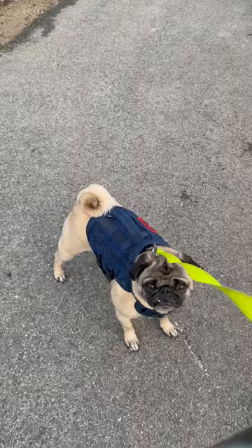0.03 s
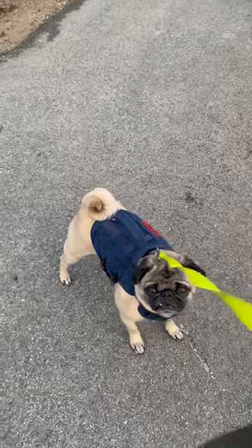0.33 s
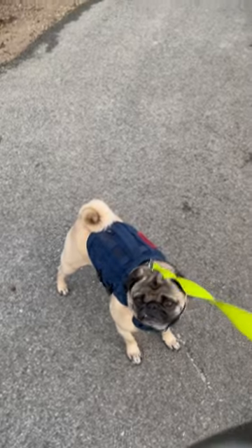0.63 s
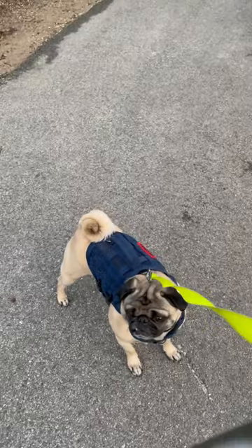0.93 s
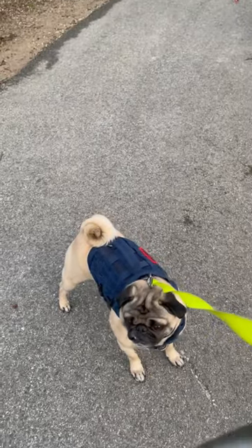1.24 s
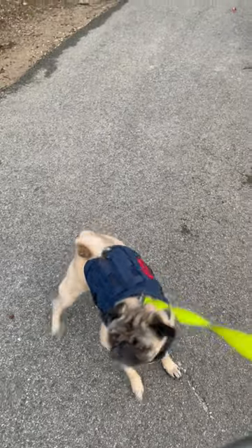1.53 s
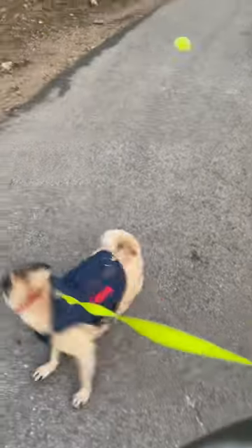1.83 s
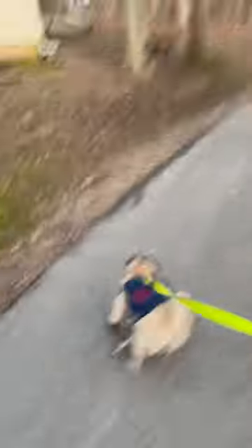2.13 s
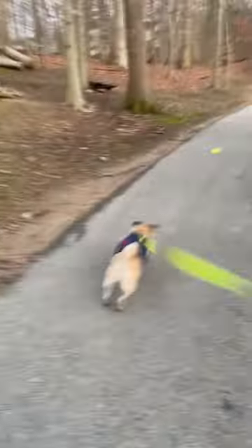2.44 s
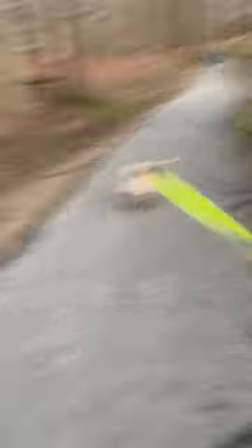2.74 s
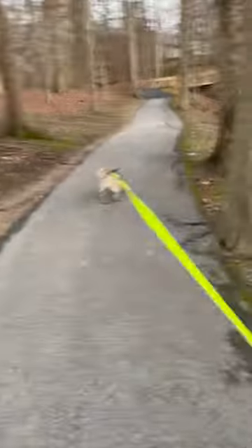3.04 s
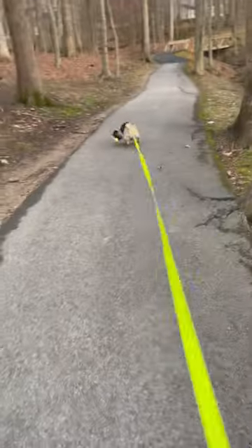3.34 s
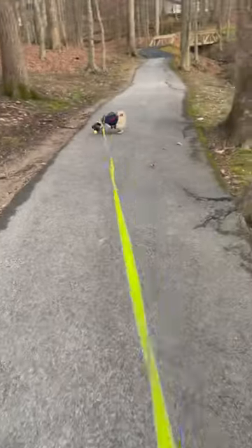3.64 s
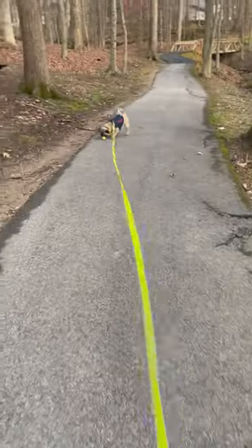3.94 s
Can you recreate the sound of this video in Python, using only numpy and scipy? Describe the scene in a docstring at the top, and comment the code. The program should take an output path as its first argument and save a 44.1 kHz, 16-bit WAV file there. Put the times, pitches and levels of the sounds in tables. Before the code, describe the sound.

A leash strap unreels close by, whirring, rattling and ticking over faint outdoor noise.

```python
"""A steady distant roar, a faint bird and low buffeting on the microphone come first. Then a small dog bolts
after a ball on a paved woodland path, and its webbing leash runs out through the hand, close by. The weave
sings at a pitch that follows each bound, over a rush of friction and the reel's rattle. The dog's claws tick
and scratch; the strap snaps, flaps and scrapes as it uncoils; the hand rustles and thumps on the phone."""
import sys
import numpy as np
from scipy import signal
from scipy.fft import rfft, irfft
from scipy.io import wavfile
from scipy.ndimage import uniform_filter1d

SR = 44100
rng = np.random.default_rng(int(sys.argv[2]) if len(sys.argv) > 2 else 0)


def master_out(mix):
    """Clip the mix to full scale and print it as 16-bit PCM to the path in sys.argv[1]."""
    frames = np.transpose(np.atleast_2d(mix))
    ceiling = np.clip(frames, -1, 1)
    pcm = np.round(ceiling * 32767).astype(np.int16)
    wavfile.write(sys.argv[1], SR, pcm)


N = 176400
T = np.arange(N) / SR


# The strap's speed, surging with each bound. Each row: time in seconds, ribs passing per second.
RIBS_PER_S = [(1.8, 830), (1.905, 1110), (1.965, 890), (2.03, 1070), (2.12, 820), (2.18, 940), (2.23, 830),
              (2.32, 830), (2.385, 660), (2.45, 890), (2.5, 1020), (2.55, 940), (2.6, 790), (2.64, 880),
              (2.68, 1060), (2.72, 1260), (2.79, 1010), (2.85, 975), (2.88, 1220), (2.912, 1385),
              (2.975, 1220), (3.03, 870), (3.065, 980), (3.115, 1350), (3.195, 880), (3.23, 775),
              (3.278, 970), (3.35, 740)]
# How hard the weave sings. Each row: time in seconds, drive of the fundamental and of the overtones in dB.
WEAVE_DRIVE = [(1.78, -75, -70), (1.85, -53, -54), (1.94, -44.5, -52), (1.99, -60, -57), (2.04, -57, -49),
               (2.1, -62, -63), (2.18, -51, -60), (2.28, -59, -50), (2.36, -58, -45), (2.42, -57, -60),
               (2.5, -45, -43), (2.62, -55, -53), (2.67, -42.5, -48), (2.73, -49, -44), (2.84, -41.5, -44),
               (2.91, -44, -40.5), (2.97, -48, -43), (3.0, -41.5, -54), (3.055, -46, -41.5),
               (3.1, -49, -48), (3.24, -55, -52), (3.29, -44, -51), (3.36, -75, -75)]
# Balance of the harmonics: one trim in dB for each, from the fundamental up.
HARMONIC_TRIMS = [0, 0, -8, -2, -12]
def singing_weave():
    """Passing ribs make a tone that rises with the strap's speed and sounds through the housing."""
    jitter, patchy_db = .0115, 3
    rib_hz = uniform_filter1d(curve(RIBS_PER_S), size=800) * (1 + jitter * wander(500))
    phase = 2 * np.pi * np.cumsum(rib_hz) / SR
    times, fundamental_db, overtone_db = np.array(WEAVE_DRIVE).T
    tone = np.zeros(N)
    for harmonic, trim_db in enumerate(HARMONIC_TRIMS, start=1):
        drive_db = np.interp(T, times, fundamental_db if harmonic == 1 else overtone_db)
        tone += amp(drive_db + trim_db + patchy_db * wander(60)) * unit(np.sin(harmonic * phase))
    return irfft(rfft(tone) * ringing(HOUSING_RESONANCES))


# The swell of the friction. Each row: time in seconds, level in dB.
FRICTION_LEVEL = [(1.42, -71), (1.5, -58), (1.75, -54.5), (1.81, -44), (1.9, -43), (1.95, -49.5),
                  (2.04, -41.5), (2.17, -49), (2.25, -39), (2.32, -44), (2.5, -42.5), (2.6, -41.5),
                  (2.9, -40), (3.0, -45), (3.14, -34.5), (3.22, -42.5), (3.3, -41), (3.37, -48),
                  (3.47, -53), (3.62, -62.5), (4.0, -62.5)]
# The mid-heavy colour of strap and hand. Each row: frequency in Hz, relative level in dB.
FRICTION_EQ = [(150, -26), (400, -16.5), (700, -9.5), (1020, 0.5), (1250, -7.5), (1700, -0.5), (2500, -2.5),
               (3050, -7), (4300, -7.5), (4900, -6), (6600, -12), (8500, -19), (10200, -17.5), (14000, -34),
               (16500, -44)]
def rubbing():
    """The strap's fibres drag through the hand in a gritty rush."""
    return colour(grit(spread_db=0.5), response(FRICTION_EQ)) * amp(curve(FRICTION_LEVEL))


# The ring of the reel's housing. Each row: frequency in Hz, width in Hz, relative level in dB.
HOUSING_RESONANCES = [(1010, 210, 1), (1340, 120, -6), (1670, 90, -3), (1960, 200, 1), (2440, 140, 1.5),
                      (2740, 130, -1), (3080, 230, -3), (3940, 170, -2), (4760, 200, -1), (5370, 400, 0)]
def reel_rattle():
    """Tiny random knocks ring the housing, riding just under the friction."""
    knocks_per_s, trim_db = 650, -5
    knocks = unit(rng.standard_normal(N) * (rng.random(N) < knocks_per_s / SR))
    return colour(knocks, ringing(HOUSING_RESONANCES)) * amp(curve(FRICTION_LEVEL) + trim_db)


def running_strap():
    """Weave, reel and friction flutter in level together."""
    flutter_db = 1.5
    return (singing_weave() + reel_rattle() + rubbing()) * amp(flutter_db * wander(110))


# Sharp ticks of the dog's claws, most as it starts off. Each row: start in seconds, strength in dB, decay in
# ms.
TICK_HITS = [(1.5225, -32, 2.4), (1.5262, -29.5, 3.2), (1.5768, -22, 0.39), (1.5795, -38, 1.5),
             (1.6365, -21.5, 0.3), (1.659, -27, 1), (1.7555, -20.5, 1.2), (1.7665, -22.5, 1.5),
             (1.8495, -33, 0.79), (1.987, -24.5, 1.1), (2.2115, -29, 5), (3.789, -44, 2.6)]
# Their bright edge. Each row: frequency in Hz, relative level in dB.
TICK_EQ = [(500, -22), (2000, -5), (3500, -3), (4700, 3), (5900, 4.5), (7200, 12.5), (10000, 0.5),
           (13000, -6.5), (16000, 8.5)]
def ticks():
    """The dog's claws scratch in small, sharp ticks."""
    return colour(bursts(TICK_HITS), response(TICK_EQ))


# Hard snaps. Each row: start in seconds, strength in dB, decay in ms.
SNAP_HITS = [(1.8915, -18.5, 1.2), (2.2355, -21.5, 1.1), (2.2805, -29, 3.2), (2.4945, -26, 2.8)]
# Their high ring. Each row: frequency in Hz, width in Hz, relative level in dB.
SNAP_RESONANCES = [(1700, 1000, -9), (2640, 120, -0.5), (4090, 77, -1), (4940, 250, -4.5), (5840, 650, -6),
                   (10200, 380, -15)]
def snaps():
    """The strap snaps taut and rings briefly."""
    return colour(bursts(SNAP_HITS), ringing(SNAP_RESONANCES))


# Duller slaps. Each row: start in seconds, strength in dB, decay in ms.
FLAP_HITS = [(2.7795, -27.5, 5), (2.8978, -27.5, 3), (2.9078, -26, 3.5), (2.9268, -28.5, 2),
             (2.957, -33, 1.5), (3.0305, -29.5, 4), (3.129, -30, 4), (3.146, -29.5, 4), (3.174, -29.5, 3),
             (3.2985, -30, 2)]
# Their midrange body. Each row: frequency in Hz, width in Hz, relative level in dB.
FLAP_RESONANCES = [(1050, 230, -16), (1750, 105, 6), (2270, 290, -6.5), (3740, 990, -12.5)]
def flaps():
    """Loops of strap flap against the hand."""
    return colour(bursts(FLAP_HITS), ringing(FLAP_RESONANCES))


# Short dry scrapes. Each row: middle in seconds, level in dB, length in seconds.
SCRAPE_SWELLS = [(.17, -70.5, 0.1), (1.502, -47.5, 0.025), (1.6, -48, 0.022), (1.68, -50, 0.028),
                 (2.03, -49, 0.014), (2.228, -37, 0.013), (2.46, -42, 0.016), (3.485, -39.5, 0.021),
                 (3.52, -47, 0.014), (3.565, -45, 0.026), (3.675, -50.5, 0.072), (3.712, -41.5, 0.022)]
# Their hissy colour. Each row: frequency in Hz, relative level in dB.
SCRAPE_EQ = [(500, -6), (2000, -9.5), (5200, 1.5), (10500, 0), (13000, -4.5), (16000, 1.5)]
def scrapes():
    """Brief gritty slides as the strap shifts, starts and stops."""
    return swells(SCRAPE_SWELLS) * colour(grit(spread_db=4), response(SCRAPE_EQ))


# The leash's stereo width. Each row: frequency in Hz, side against mid in dB before the scatter.
LEASH_WIDTH = [(200, 4), (480, 15), (1050, -12.5), (2000, -8.5), (6000, -5), (9500, -1), (14000, -3.5)]
def close_by(sound):
    """Sound reaches the left port first; hand, body and ground add scattered reflections."""
    scatter_db, left_vs_right_db = -7, -0.5
    reflections = rfft(rng.standard_normal(N) * np.exp(-T / 0.002))
    scatter = amp(scatter_db) * reflections / np.abs(reflections).mean()
    side = irfft(rfft(sound) * response(LEASH_WIDTH) * (1j + scatter))  # 1j puts the left ahead in phase
    pan = amp(np.array([[left_vs_right_db], [-left_vs_right_db]]) / 2)
    return stereo(sound, side) * pan


# Soft rustles as the phone turns. Each row: middle in seconds, level in dB, length in seconds.
GRIP_SWELLS = [(1.55, -46.5, 0.34), (2.04, -44, 0.29), (2.505, -39, 0.024), (3.31, -43.5, 0.12),
               (3.66, -53, 0.27)]
# Their muffled colour. Each row: frequency in Hz, relative level in dB.
GRIP_EQ = [(70, -27.5), (150, 5), (270, 4), (420, -11.5), (700, -15), (2000, -52.5)]
def grip_rustle():
    """The grip shifts with a low rustle; the stronger moves differ most between the ports."""
    side_db = -10
    level = swells(GRIP_SWELLS)
    mid, side = noise_pair(GRIP_EQ) * level
    return stereo(mid, side * amp(side_db) * (level / level.max()) ** 2)


# Soft low bumps. Each row: start in seconds, envelope peak in dB, pitch in Hz.
HAND_BUMPS = [(.487, -37, 85), (.8, -36.5, 60), (1.11, -37, 75), (1.932, -33, 150), (2.013, -32, 100),
              (2.092, -30, 95), (2.275, -30, 60), (2.418, -31.5, 90), (2.522, -31, 75), (2.607, -31.5, 65),
              (3.402, -29, 68), (3.622, -35, 130)]
def thumps():
    """The hand bumps the phone; each bump swells and dies within a few low cycles."""
    rise_s = .008
    out = np.zeros(N)
    for start, db, hz in HAND_BUMPS:
        age = np.maximum(T - start, 0)
        envelope = age / rise_s * np.exp(1 - age / rise_s)
        out += amp(db) * envelope * np.sin(2 * np.pi * hz * age)
    return out


# The weight of the buffeting. Each row: frequency in Hz, relative level in dB.
BUFFET_EQ = [(30, -9.5), (45, -2), (70, 3.5), (100, -2.5), (160, -9.5), (260, -18.5), (500, -25.5),
             (1500, -64.5)]
# Its surges. Each row: time in seconds, level in dB.
BUFFET_LEVEL = [(0, -46), (.8, -43.5), (.9, -48), (1.03, -42), (1.2, -50), (1.85, -48), (2.08, -42),
                (2.55, -41), (2.7, -46), (3.24, -46), (3.34, -33.5), (3.49, -43), (4, -45)]
def buffeting():
    """Air and handling rumble as the phone swings; the ports differ most in the strongest gusts."""
    side_db = -19
    gust = amp(curve(BUFFET_LEVEL) + wander(6.6))
    mid, side = noise_pair(BUFFET_EQ) * gust
    return stereo(mid, side * amp(side_db) * gust / gust.max())


# The dark bed under the scene. Each row: frequency in Hz, relative level in dB.
ROAR_EQ = [(60, -18), (160, -1.5), (430, -4), (700, -7.5), (1040, -8), (2400, -27.5), (5300, -35.5),
           (7000, -50), (9500, -65), (16000, -95)]
# Its slow drift. Each row: time in seconds, level in dB.
ROAR_DRIFT = [(0, -48), (1.6, -47.5), (2.4, -50.5), (3.5, -47), (4, -49.5)]
# Its stereo width. Each row: frequency in Hz, side against mid in dB.
ROAR_WIDTH = [(130, -82), (400, -22.5), (700, -4), (4400, -1.5), (7000, 4.5), (9500, 12)]
def distant_roar():
    """Steady far-off noise, wide in the treble and centred in the bass."""
    mid, side = noise_pair(ROAR_EQ) * amp(curve(ROAR_DRIFT))
    return stereo(mid, irfft(rfft(side) * response(ROAR_WIDTH)))


# Faint calls. Each row: start and length in seconds, first, middle and last pitch in Hz, level in dB.
BIRD_CALLS = [(.02, .11, 2450, 2200, 2220, -67), (.21, .1, 2020, 2130, 2380, -68)]
def bird():
    """Two thin, wavering whistles: one sags, the other rises."""
    out = np.zeros(N)
    for start, length, first, middle, last, db in BIRD_CALLS:
        progress = np.clip((T - start) / length, 0, 1)
        hz = np.interp(progress, [0, .5, 1], [first, middle, last]) * (1 + 0.025 * wander(292))
        envelope = np.sqrt(np.abs(np.sin(np.pi * progress)))
        out += amp(db) * envelope * np.sin(2 * np.pi * np.cumsum(hz) / SR)
    return out


def bursts(hits):
    """Each contact is one sharp blow, then clatter that dies within milliseconds."""
    crack_db, clatter_db = 9, 1
    out, clatter = np.zeros(N), rng.choice([-1, 1], N)
    for start, db, decay_ms in hits:
        age_ms = 1000 * np.maximum(T - start, 0)
        out += (age_ms > 0) * amp(db + clatter_db) * np.exp(-age_ms / decay_ms) * clatter
        out[int(start * SR)] += amp(db + crack_db)
    return out


def grit(spread_db):
    """Noise made of tiny catches of uneven size."""
    return unit(rng.standard_normal(N) * amp(spread_db * wander(1800)))


def noise_pair(eq):
    """Two independent noises of the same colour."""
    return np.array([colour(rng.standard_normal(N), response(eq)) for _ in range(2)])


def swells(rows):
    """Rounded rises and falls of level."""
    return sum(amp(db) * np.exp(-2 * ((T - middle) / length) ** 2) for middle, db, length in rows)


def wander(rate):
    """Random drift with rms 1 that heads for a new value rate times a second."""
    return unit(np.interp(T * rate, np.arange(N), rng.standard_normal(N)))


def curve(rows):
    """Join (seconds, value) rows by straight lines."""
    return np.interp(T, *np.array(rows).T)


def ringing(modes):
    """Gain at every frequency of a set of damped resonances."""
    hz = np.arange(N // 2 + 1) * SR / N
    power = np.zeros_like(hz)
    for centre, width, db in modes:
        detuning = (hz ** 2 - centre ** 2) / (hz * width + 1)
        power += amp(db) ** 2 / (1 + detuning ** 2)
    return np.sqrt(power)


def response(points):
    """Gain at every frequency of an EQ drawn through (Hz, dB) points."""
    hz, db = np.array(points).T
    bin_hz = np.arange(N // 2 + 1) * SR / N
    return amp(np.interp(np.log(bin_hz + 1e-3), np.log(hz), db))


def colour(sound, gain):
    """Causal filter shaped like the given gains that keeps the power of white noise."""
    cepstrum = irfft(np.log(unit(gain) + 1e-9))
    cepstrum[1:N // 2] *= 2  # minimum phase: the ring follows the hit
    cepstrum[N // 2 + 1:] = 0
    return irfft(rfft(sound) * np.exp(rfft(cepstrum)))


def stereo(mid, side):
    """Mid and side to left and right."""
    return np.array([mid + side, mid - side])


def amp(db):
    """Decibels to gain."""
    return 10 ** (np.asarray(db) / 20)


def unit(x):
    """Scale to rms 1."""
    return x / np.sqrt(np.mean(x ** 2))


def scene():
    """The leash up front, its rush also scattered from all around, over handling and the outdoor bed."""
    diffuse_db, start_s = -11, .035
    leash = close_by(running_strap() + ticks() + snaps() + flaps() + scrapes())
    diffuse_rush = amp(diffuse_db) * np.array([rubbing(), rubbing()])
    hand = grip_rustle() + thumps()
    outdoors = distant_roar() + buffeting() + bird()
    return (leash + diffuse_rush + hand + outdoors) * (T > start_s)


# The microphone pair's dips for sound common to both sides. Each row: frequency in Hz, gain in dB.
MIC_NOTCHES = [(6300, -0.5), (7100, -13), (7800, -31.5), (8600, -3.5), (9500, 1), (12800, 2), (14200, -29),
               (15300, -14)]
def record(dry):
    """The microphone pair notches the treble; the deepest bass and the top are cut."""
    low_cut_hz, high_cut_hz = 33, 16100
    mid = irfft(rfft(dry.mean(axis=0)) * response(MIC_NOTCHES))
    side = (dry[0] - dry[1]) / 2
    low_cut = signal.butter(8, low_cut_hz, "high", fs=SR, output="sos")
    high_cut = signal.ellip(8, .2, 70, high_cut_hz, fs=SR, output="sos")
    return signal.sosfilt(high_cut, signal.sosfilt(low_cut, stereo(mid, side)))


dry = scene()
out = record(dry)
master_out(out)
```